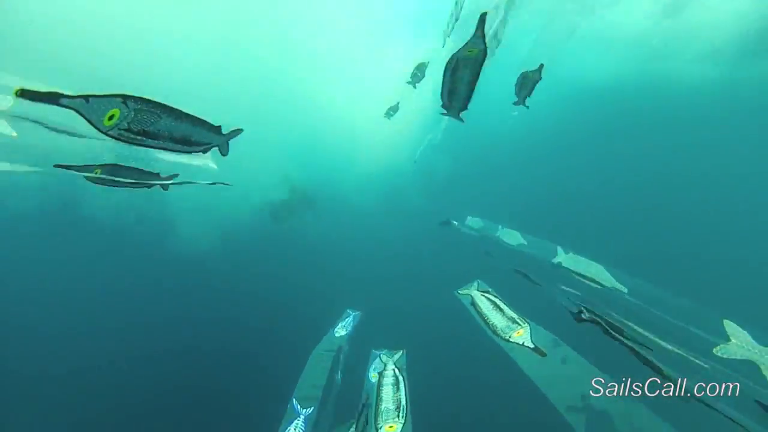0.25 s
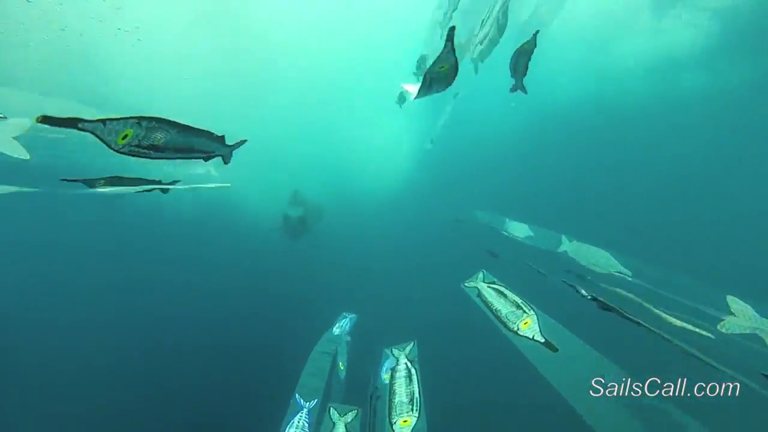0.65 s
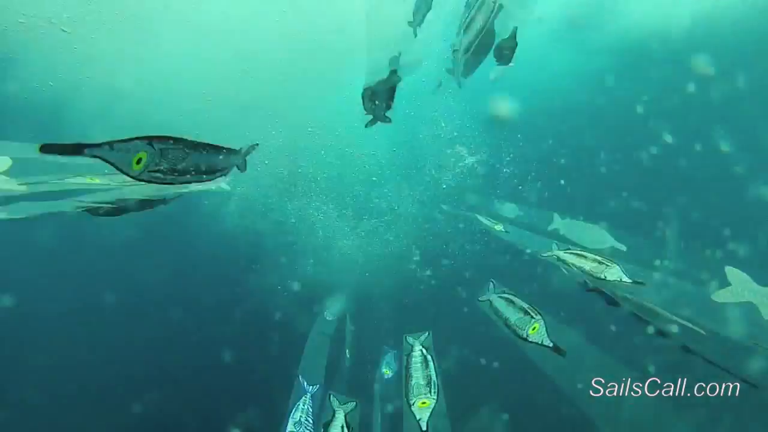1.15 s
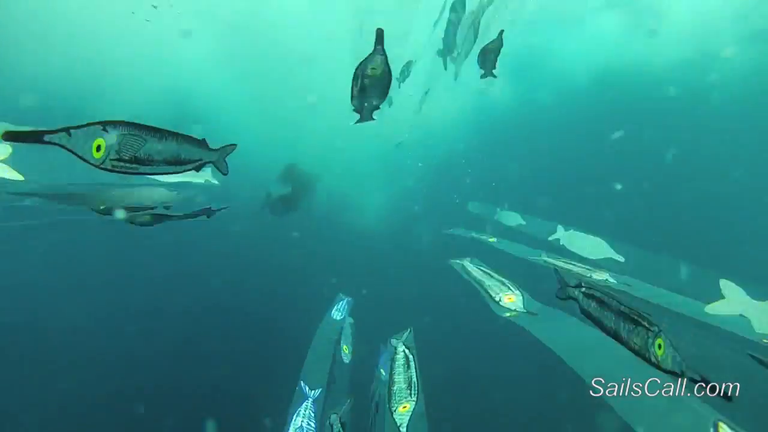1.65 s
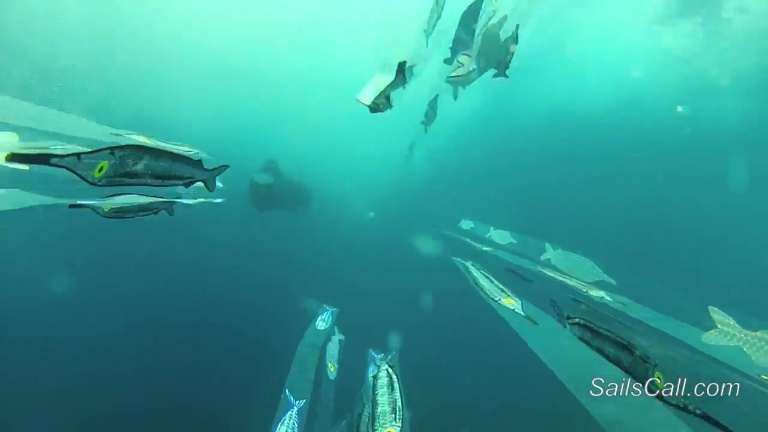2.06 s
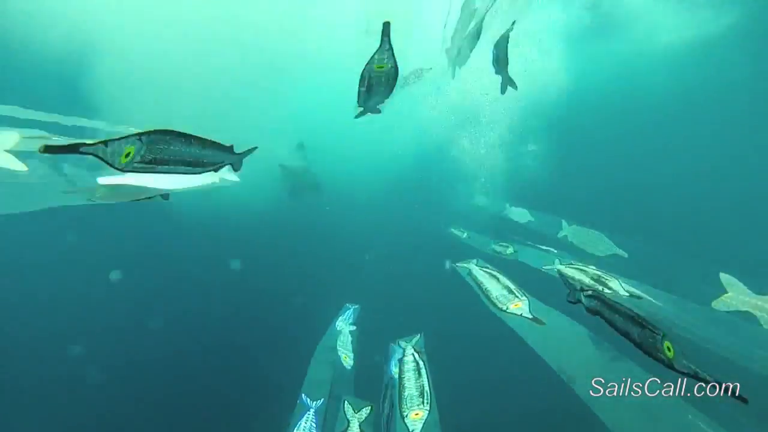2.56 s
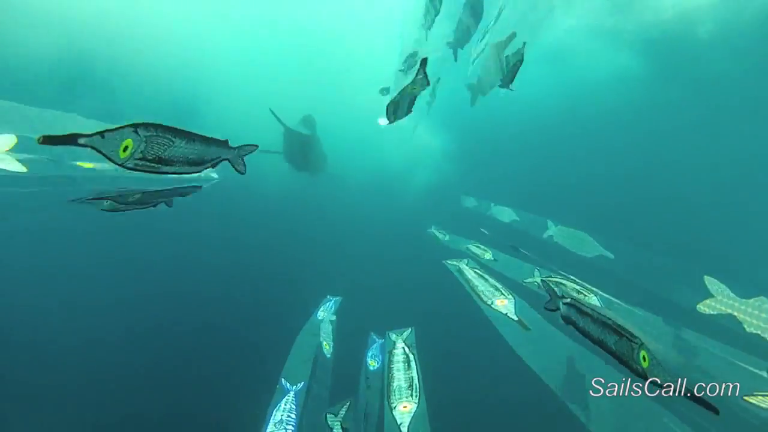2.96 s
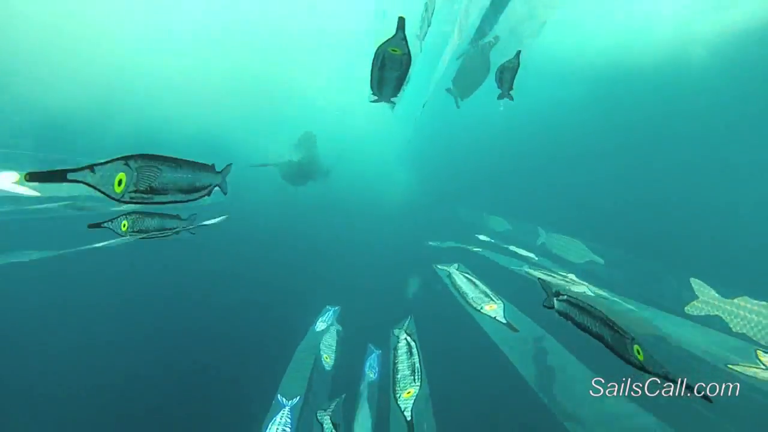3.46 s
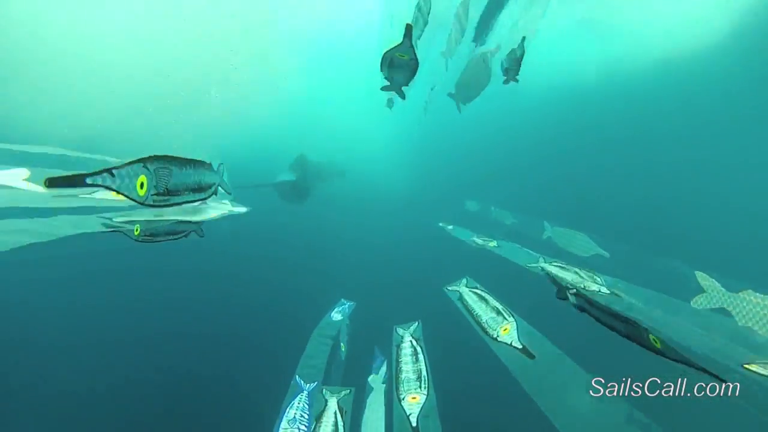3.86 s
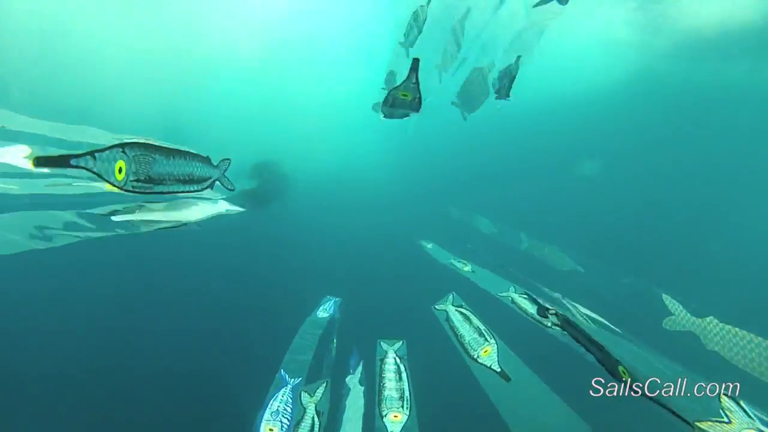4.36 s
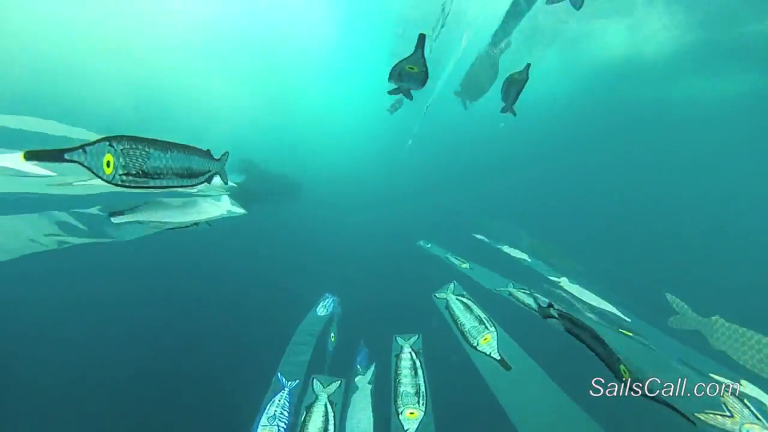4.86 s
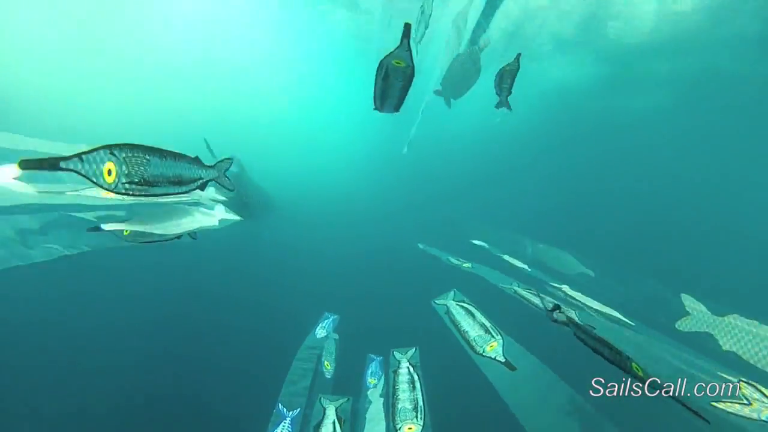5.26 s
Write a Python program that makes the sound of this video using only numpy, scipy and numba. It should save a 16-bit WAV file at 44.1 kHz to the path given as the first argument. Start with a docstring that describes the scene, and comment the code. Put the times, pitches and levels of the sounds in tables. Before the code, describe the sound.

A close, boxy underwater sound. Deep eddies thump the housing, an engine drones low and nearly pure in uneven spells, and water hisses and gurgles in short gushes. Soon after the start, bubbles rush past in a brief sparkling fizz with clicks. Afterwards sparse tiny pops continue over the drone, a rougher low tone growing stronger in later seconds. The microphone is enclosed, coarse and muffled.

```python
"""A boat engine hums through the water: a wobbling sine with a rougher tone of filtered noise above it.
A small camera is towed behind in a housing. Eddies buffet the case as slow-swaying low noise, and rushing
water is noise that rings its body, walls and port. A cloud of wake bubbles sweeps past as short rising sines,
with ticks of noise on the port; stray bubbles crackle throughout. Sampling at 8000 Hz, with each value held,
mirrors the bass in the treble."""
import sys
import numpy as np
from scipy import signal
from scipy.fft import rfft, irfft
from scipy.io import wavfile
from scipy.ndimage import uniform_filter1d
from numba import njit

SR = 44100
rng = np.random.default_rng(int(sys.argv[2]) if len(sys.argv) > 2 else 0)


def dump_mix(stems):
    """Bounce the given channels to the path in sys.argv[1] as a 16-bit WAV at rate SR."""
    frames = np.atleast_2d(stems).T  # one column per channel
    limited = np.clip(frames, -1, 1)  # hard clip at full scale
    pcm = np.round(limited * 32767).astype(np.int16)
    wavfile.write(sys.argv[1], SR, pcm)


N = 242550  # length [samples]

# engine hum, coming in spells: (time [s], pitch [Hz], level [dB], flutter depth [dB])
ENGINE_HUM = [(0.0, 129.3, -14, 2), (0.3, 130.2, -18, -1.5), (0.49, 136.2, -12, 2.5),
              (0.58, 134.2, -25.5, 2), (0.86, 134.9, -25.5, 5), (1.1, 137.8, -27.5, 6),
              (1.17, 135.6, -18, 4), (1.33, 138.1, -12.5, 3.5), (1.48, 141.4, -12.5, -1.5),
              (1.62, 137.7, -15.5, -2), (1.8, 132.2, -15, 2), (1.96, 129.8, -30, -3), (2.28, 132.5, -21, 2),
              (2.33, 134.7, -14, 4.5), (2.5, 136.5, -21.5, 3.5), (2.58, 135.7, -30.5, 6.5),
              (2.9, 139.6, -31, 6.5), (2.96, 140, -15.5, 0), (3.45, 140.2, -15, 2.5),
              (3.73, 143.4, -14.5, 0), (3.78, 143.9, -30, 4), (4.0, 148, -26.5, 4.5),
              (4.2, 146.8, -22.5, 6), (4.42, 140.9, -26, 2.5), (4.52, 146, -22, 5), (4.75, 144.6, -13.5, 4),
              (5.17, 137.6, -18, 2), (5.24, 137.7, -26.5, 3), (5.36, 138.6, -25, 7), (5.5, 138, -23.5, 0)]
# rougher tone above the hum: (time [s], level [dB])
UPPER_TONE = [(0.0, -30), (0.03, -26.5), (1.3, -22.5), (1.36, -39), (1.45, -23), (1.71, -26), (1.74, -28.5),
              (2.74, -20), (2.86, -30.5), (3.12, -19.5), (3.15, -25), (3.26, -13.5), (3.32, -26.5),
              (3.74, -19.5), (4.03, -25.5), (4.11, -16), (4.53, -18.5), (4.6, -13), (4.63, -26),
              (4.73, -12), (4.86, -33), (4.95, -16), (5.19, -31), (5.5, -20.5)]
# sharpest resonance of the housing: (time [s], level [dB])
HOUSING_SONG = [(0.0, -34), (0.14, -29.5), (0.2, -35.5), (0.52, -32), (0.87, -39), (1.21, -32.5),
                (1.82, -31.5), (1.85, -31), (2.1, -42), (2.45, -26), (2.56, -37), (2.76, -25.5),
                (2.96, -30.5), (3.41, -22), (3.48, -40), (3.58, -20.5), (3.63, -39), (3.72, -27.5),
                (4.27, -34.5), (4.32, -26.5), (4.41, -34), (5.5, -27.5)]
# eddies that shake the housing: (time [s], level [dB], centre [Hz])
EDDY_BUFFET = [(0.0, -15.5, 48.4), (0.35, -23, 63.7), (0.6, -23.5, 53.6), (1.0, -17, 48.8),
               (1.4, -18.5, 41), (1.85, -24.5, 56), (2.1, -18.5, 43.2), (2.4, -18.5, 44.2),
               (2.7, -15, 44.06), (3.2, -18.5, 51.3), (3.6, -15.5, 54), (3.9, -18, 45.7),
               (4.2, -20.5, 49.3), (4.55, -12.5, 36.9), (5.0, -22.5, 41.3), (5.5, -17.5, 46.3)]
# strongest thuds of single eddies: (start [s], nominal length [s], rise [dB])
EDDY_THUDS = [(0.0, 0.026, 6.5), (0.672, 0.057, 6.5), (1.662, .08, 7), (1.54, .04, 4), (1.81, .04, 5),
              (1.92, 0.048, 5), (2.06, .05, 5), (2.53, .05, 5), (2.7, .06, 6), (2.78, .05, 6),
              (2.86, 0.046, 3), (3.621, 0.057, 7), (3.76, .1, 4), (4.02, 0.049, 8), (4.161, .08, 10),
              (4.47, .12, 5), (5.23, .07, 2.5)]
# water rushing along the case: (time [s], level on the walls [dB], level on the port [dB])
WATER_RUSH = [(0.0, -30.5, -34), (0.35, -35, -40), (0.85, -33.5, -39), (1.4, -36, -42.5),
              (2.0, -35.5, -41.5), (2.6, -33.5, -41.5), (3.2, -34, -38), (3.9, -32.5, -39.5),
              (4.5, -32.5, -37.5), (5.0, -33, -39), (5.5, -34.5, -41.5)]
# sudden gushes along the case: (start [s], nominal length [s], change on walls [dB], change on port [dB])
WATER_GUSHES = [(0.028, 0.021, 4, 1), (0.087, 0.032, 2, 5.5), (0.167, 0.048, 9.5, 13), (0.28, 0.039, 3, 7),
                (0.425, 0.096, 4.5, 4), (0.691, 0.025, 3.5, 5.5), (0.958, 0.03, 4.5, 3.5),
                (1.01, 0.061, 5.5, 11.5), (1.152, 0.052, 3, 4), (1.276, 0.028, 3, 4.5),
                (1.376, 0.029, 2, 8), (1.462, 0.063, 7.5, 7), (1.63, 0.059, 9.5, 9.5),
                (1.823, 0.069, 3, 3.5), (2.049, .045, 4, 7), (2.156, 0.046, 6, 4), (2.299, 0.03, -4, 5),
                (2.386, .03, 4.5, 3.5), (2.47, 0.046, 2.5, 4.5), (2.652, 0.067, 9.5, 6.5),
                (3.0, 0.033, 2, -7), (3.224, .06, 7.5, 4.5), (3.327, 0.025, 0, 2), (3.586, 0.031, 1, 3),
                (3.653, 0.018, 6.5, -1), (3.766, 0.047, -0.5, 4.5), (4.033, 0.038, 9, 5.5),
                (4.3, 0.089, 3, -1), (4.5, 0.063, 5, 0.5), (4.57, 0.044, 4, 6.5), (4.82, 0.028, 4, 2),
                (4.87, 0.051, 1.5, 3.5), (5.056, 0.028, 1, 8), (5.29, .04, 2, 1.5),
                (5.471, 0.033, 2.5, 2.5)]
# slower water rumbling in the body of the case: (time [s], level [dB])
BODY_RUMBLE = [(0.0, -31.5), (0.6, -26), (1.0, -29.5), (1.4, -25.5), (2.0, -27.5), (2.4, -27.5),
               (2.7, -24.5), (3.1, -26.5), (4.3, -25), (5.5, -25)]
# resonances of the body: (centre [Hz], width between half-amplitude points [Hz], relative level [dB])
BODY_MODES = [(104, 66, 5), (215, 83, 0), (235, 22, 1), (285.6, 44.5, 0.5), (389, 85, -6.5)]
# resonances of the walls: (centre [Hz], width between half-amplitude points [Hz], relative level [dB])
WALL_MODES = [(533.2, 91, 0.5), (665, 125, -5), (762.7, 21, -2), (866, 114, -6), (975, 65, -14)]
# resonances of the port: (centre [Hz], width between half-amplitude points [Hz], relative level [dB])
PORT_MODES = [(1235, 132, -6), (1400, 180, -1), (1545, 90, -7), (1837, 91, -1.5), (1979, 88, -2.5),
              (2076, 102, -6), (2363, 230, -16), (2513, 204, -10), (2726, 133, -9), (2982, 117, -10),
              (3302, 180, -23.5), (3630, 640, -31.5)]
# passing bubble cloud: (time [s], level [dB])
BUBBLE_CLOUD = [(0.9, -60), (0.92, -43), (0.96, -32), (1.0, -30.5), (1.03, -28.5), (1.1, -32.5),
                (1.14, -34), (1.16, -40), (1.18, -37), (1.2, -43), (1.22, -34), (1.24, -46), (1.29, -51)]
# larger single bubbles: (time [s], level before swell and fade [dB], starting pitch [Hz], 60 dB decay [s])
RINGING_BUBBLES = [(0.9774, -22, 1980, 0.026), (1.012, -10.5, 2840, 0.022), (1.0303, -14, 1970, 0.02),
                   (1.0394, -16, 3260, 0.022), (1.056, -17.5, 3100, 0.029), (1.1276, -9, 2820, 0.019),
                   (1.1436, -7, 2820, 0.0094), (1.1647, -23, 3100, 0.044), (1.2074, -21.5, 1890, 0.019),
                   (1.2175, -11.5, 3540, 0.018), (1.305, -22, 2080, 0.018)]
# bubbles that burst on the port: (time [s], peak [dB])
BURSTS = [(0.9203, -29), (0.955, -39), (1.103, -27), (1.182, -32), (1.25, -41), (1.304, -28.5),
          (1.388, -30), (1.397, -29.5), (1.599, -21.5)]
# loudest stray bubbles behind the cloud: (time [s], peak [dB], starting pitch [Hz])
STRAY_BUBBLES = [(1.6481, -30, 2570), (1.7685, -35, 2530), (1.8194, -32, 2500), (1.8927, -32, 2660),
                 (2.0074, -32, 2680), (2.0578, -34, 2970), (2.2788, -33, 2706), (2.3976, -38, 2740),
                 (2.5387, -32, 2660), (2.876, -32, 2555), (3.1329, -35, 2510), (3.1948, -31, 2700),
                 (3.2577, -36, 2652), (3.546, -34, 2640), (3.5894, -33, 2549), (3.8009, -34, 2306),
                 (3.9141, -33, 2680), (3.951, -39, 2657), (4.0518, -35, 2660), (4.2329, -35, 2687),
                 (4.3468, -28, 2520), (4.4145, -32, 2440), (4.4858, -36, 2570), (4.5615, -28, 2500),
                 (4.637, -35, 2683), (4.7138, -28.5, 2680), (4.852, -28, 2700), (4.9404, -32, 2490),
                 (5.0695, -27, 2700), (5.1124, -35, 2410), (5.3828, -35, 2660), (5.4297, -37, 2693)]

SURGE_ATTACK, SURGE_HALF_RELEASE = 0.32, 0.48  # shares of a surge's nominal length
CLOUD_HZ = 2995  # median starting pitch of the fizz
TICK_HZ, TICK_WIDTH_HZ, TICK_S = 3580.0, 1250.0, 0.0058
SAMPLES_A_SECOND = 8000
TOP_HZ = 15315  # final cutoff


def undb(db):
    """Decibels to gain."""
    return 10 ** (np.asarray(db) / 20)


def unit(x):
    """Scale to rms 1."""
    return x / np.sqrt(np.mean(x ** 2))


def curve(rows):
    """Columns of a table, joined by straight lines in time."""
    s, *columns = np.transpose(rows)
    return [np.interp(np.arange(N) / SR, s, column) for column in columns]


def walk(rate):
    """Random drift of rms 1: levels held for 1 / rate seconds, then smoothed twice."""
    hold = int(SR / rate)
    steps = np.repeat(rng.standard_normal(N // hold + 1), hold)
    smooth = uniform_filter1d(uniform_filter1d(steps, hold), hold)
    return unit(smooth[:N])


def surge(start, length):
    """0 to 1 and back: quick attack, hold, slower release that is halfway down at the nominal length."""
    corners = np.array([0, SURGE_ATTACK, 1 - SURGE_HALF_RELEASE, 1 + SURGE_HALF_RELEASE])
    return np.interp(np.arange(N) / SR, start + length * corners, [0, 1, 1, 0])


@njit
def band(x, hz, width):
    """State-variable band-pass with a moving centre and gain 1 at that centre."""
    y, band_state, low_state = np.empty(len(x)), 0., 0.
    for i in range(len(x)):
        g, damping = np.tan(np.pi * hz[i] / SR), width / hz[i]
        v = (band_state + g * (x[i] - low_state)) / (1 + g * (g + damping))
        band_state = 2 * v - band_state
        low_state += 2 * g * v
        y[i] = damping * v
    return y


def sway(hz, width_hz, steady):
    """A resonance shaken by turbulence; steady 0-1 evens out its swing, as a self-sustained motion does."""
    x = band(rng.standard_normal(N), hz, width_hz)
    x = unit(band(x, hz, width_hz))
    power = np.abs(signal.hilbert(x)) ** 2
    return unit(x / (power + 0.36) ** (np.clip(steady, 0, 1) / 2))


def resonate(strength, modes, gurgle_db):
    """Each resonance rings with its own gurgling noise; squared slopes keep the valleys between them dark."""
    hz = np.fft.rfftfreq(N, 1 / SR)
    spectrum, power = 0, 0
    for centre, width, db in modes:
        shape = undb(db) / (1 + (2 * (hz - centre) / width) ** 2)
        flow = rng.standard_normal(N) * strength * undb(gurgle_db * walk(28))
        spectrum = spectrum + shape * rfft(flow)
        power = power + shape ** 2
    return irfft(spectrum, N) / np.sqrt(np.mean(power))


def ring(hz, t60, glide):
    """A bubble: a sine that swells over three cycles while it fades and slides up."""
    t = np.arange(int(t60 * SR) + 2) / SR
    swell = np.minimum(t * hz / 3, 1)
    fade = np.exp(-np.log(1000) * t / t60)
    return swell * fade * np.sin(2 * np.pi * hz * t * (1 + glide * t / t60))


def tick(hz, width_hz, length):
    """A bubble burst: a puff of noise in a wide band, peak 1."""
    t = np.arange(int(.03 * SR)) / SR
    puff = rng.standard_normal(len(t)) * t * np.exp(-4 * t / length)
    centre = np.full(len(t), hz)
    sound = band(band(puff, centre, width_hz), centre, width_hz)
    return sound / np.max(np.abs(sound))


def add(out, s, sound):
    """Mix a sound in at s seconds."""
    i = int(s * SR)
    out[i:i + len(sound)] += sound[:N - i]


def crackle(a_second=50, level_db=-46, scatter_db=4.5, hz=2650, spread=.07, cycles=15.0):
    """Stray small bubbles tick on the port all the while, each a brief rising sine."""
    count = int(a_second * N / SR)
    size, strength = rng.standard_normal((count, 2)).T
    times = rng.uniform(0, N / SR, count)
    faint = zip(times, level_db + scatter_db * strength, hz * np.exp(spread * size))
    out = np.zeros(N)
    for s, db, pitch in [*faint, *STRAY_BUBBLES]:
        pop = ring(pitch, cycles / pitch, 0.04)
        add(out, s, pop / np.max(np.abs(pop)) * undb(db))
    return out


def bubbles(a_second=2600, spread=.15, cycles=23.0, scatter_db=5.0):
    """A fizz of small ringing bubbles while the cloud passes, larger single ones, and noise bursts."""
    fizz, start, end = np.zeros(N), BUBBLE_CLOUD[0][0], BUBBLE_CLOUD[-1][0]
    count = int(a_second * (end - start))
    times = rng.uniform(start, end, count)
    for s, (size, strength) in zip(times, rng.standard_normal((count, 2))):
        hz = CLOUD_HZ * np.exp(spread * size)
        add(fizz, s, ring(hz, cycles / hz, 0.1) * undb(scatter_db * strength))
    share = (end - start) * SR / N  # levels the fizz over the cloud's span alone
    out = unit(fizz) * np.sqrt(share) * undb(curve(BUBBLE_CLOUD)[0])
    for s, db, hz, t60 in RINGING_BUBBLES:
        add(out, s, undb(db) * ring(hz, t60, .06))
    for s, db in BURSTS:
        add(out, s, undb(db) * tick(TICK_HZ, TICK_WIDTH_HZ, TICK_S))
    return out


def rush(patchy_db=0.5, bright_patchy_db=1.22, flicker_db=0.3, grain_db=2.0):
    """Patchy, grainy flow rings walls and port together; the body rumbles more evenly."""
    wall_db, port_db = curve(WATER_RUSH)
    flow_db = patchy_db * walk(17) + flicker_db * walk(45) + grain_db * walk(250)
    port_db = port_db + bright_patchy_db * walk(13)
    for start, length, wall_change_db, port_change_db in WATER_GUSHES:
        gush = surge(start, length)
        wall_db = wall_db + wall_change_db * gush
        port_db = port_db + port_change_db * gush
    body = resonate(undb(curve(BODY_RUMBLE)[0]), BODY_MODES, gurgle_db=0.45)
    walls = resonate(undb(flow_db + wall_db), WALL_MODES, gurgle_db=1.0)
    port = resonate(undb(flow_db + port_db), PORT_MODES, gurgle_db=1.66)
    return body + walls + port


def housing(thud_db=1.6, waver_db=1.2):
    """Eddies thud against the case as low swaying noise; its sharpest resonance sings on its own."""
    eddy_db, eddy_hz = curve(EDDY_BUFFET)
    thuds = sum(rise * surge(start, length) for start, length, rise in EDDY_THUDS)
    eddy_db = eddy_db + thud_db * walk(16) + thuds
    tone = sway(np.full(N, 347.), width_hz=18.0, steady=0.6)
    tone_db = curve(HOUSING_SONG)[0] + waver_db * walk(12)
    buffet = sway(eddy_hz, width_hz=34.0, steady=0.6)
    return buffet * undb(eddy_db) + tone * undb(tone_db)


def engine(wobble_hz=1.68, upper_flutter_db=2.0):
    """A nearly clean hum whose pitch wobbles a little, and a rougher tone of narrow noise just above it."""
    hz, db, flutter_db = curve(ENGINE_HUM)
    phase = 2 * np.pi * np.cumsum(hz + wobble_hz * walk(25)) / SR
    hum = np.sqrt(2) * np.sin(phase)  # rms 1
    hum_db = db + flutter_db * walk(22.03)
    upper = sway(np.full(N, 162.), width_hz=18., steady=.7)
    upper_db = curve(UPPER_TONE)[0] + upper_flutter_db * walk(14)
    return hum * undb(hum_db) + upper * undb(upper_db)


def scene():
    """Everything the microphone inside the housing hears."""
    return (crackle() + bubbles() + rush() + housing() + engine())[None]


def record(dry, bass_hz=26.6, edge_hz=4320.0, dull_hz=15800.0):
    """Loud peaks rounded; slow sampling with each value held until the next; the top dulled and cut."""
    # the microphone misses the deepest bass
    heard = signal.sosfilt(signal.butter(2, bass_hz, "high", fs=SR, output="sos"), dry)
    rounded = np.tanh(0.55 * heard) / 0.54
    # steep treble cut ahead of the slow sampling
    guarded = signal.sosfilt(signal.butter(12, edge_hz, fs=SR, output="sos"), rounded)
    samples = signal.resample_poly(guarded, SAMPLES_A_SECOND, SR, axis=1, padtype="line")
    # the held steps mirror the sound around multiples of the slow rate
    steps = np.repeat(samples, 6, axis=1)
    held = signal.resample_poly(steps, SR, 6 * SAMPLES_A_SECOND, axis=1, padtype="line")
    dulled = signal.sosfilt(signal.butter(3, dull_hz, fs=SR, output="sos"), held[:, :N])
    return signal.sosfilt(signal.ellip(12, .3, 70, TOP_HZ, fs=SR, output="sos"), dulled)


dry = scene()
out = record(dry)
dump_mix(out)
```